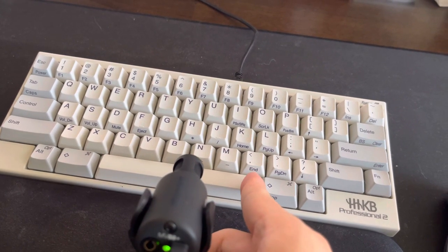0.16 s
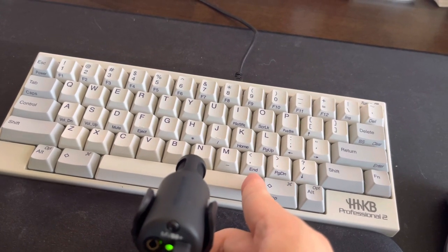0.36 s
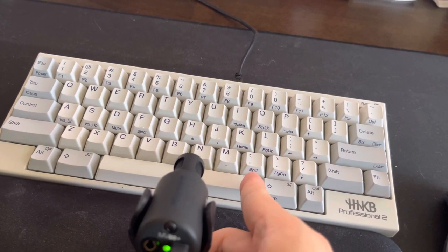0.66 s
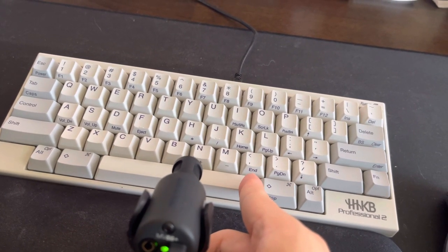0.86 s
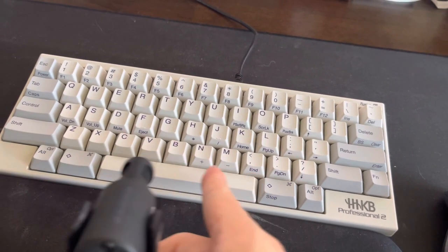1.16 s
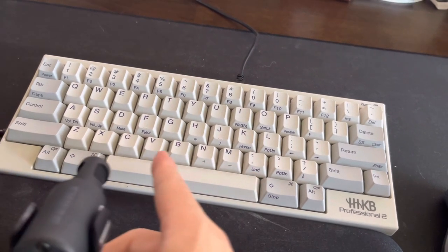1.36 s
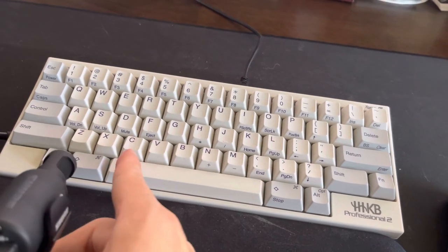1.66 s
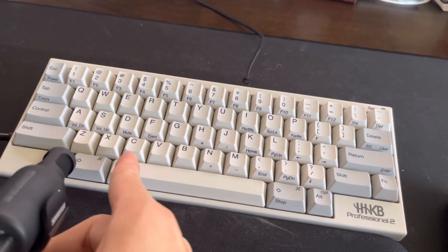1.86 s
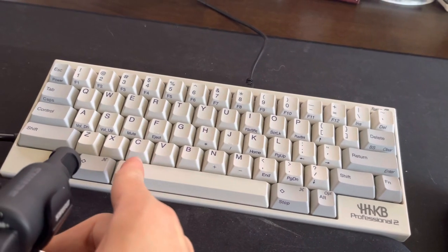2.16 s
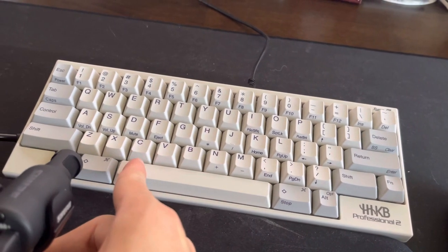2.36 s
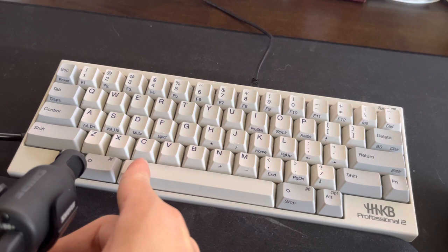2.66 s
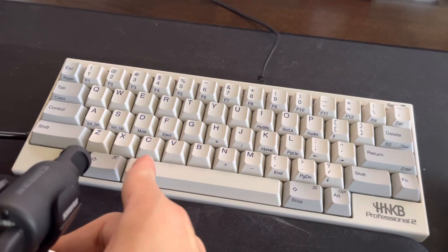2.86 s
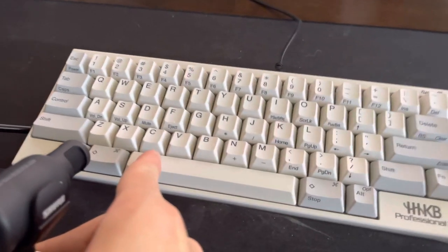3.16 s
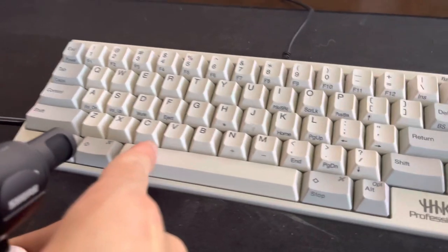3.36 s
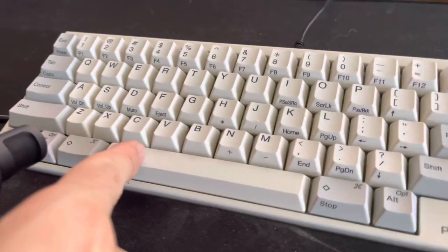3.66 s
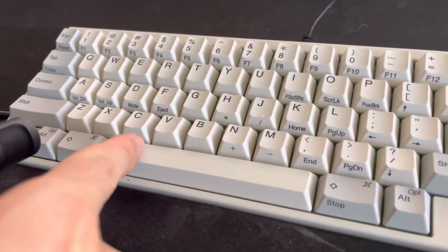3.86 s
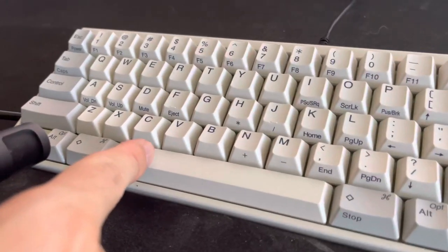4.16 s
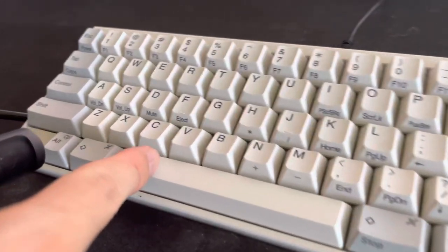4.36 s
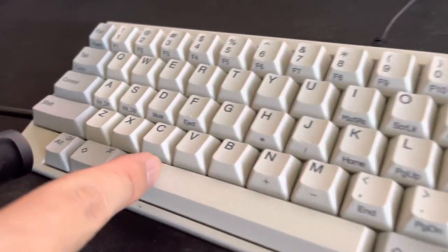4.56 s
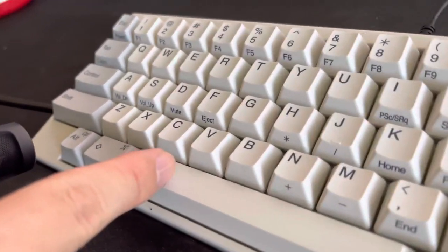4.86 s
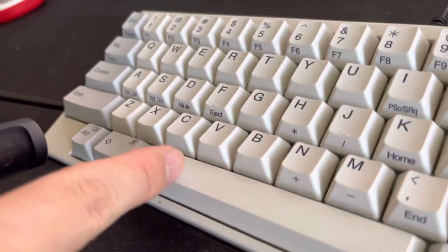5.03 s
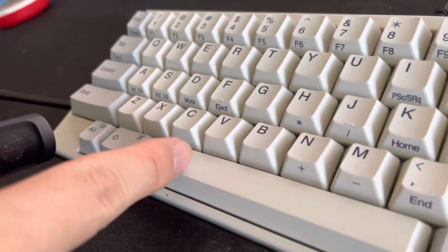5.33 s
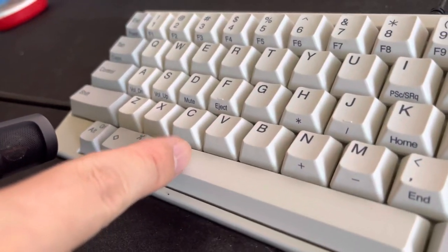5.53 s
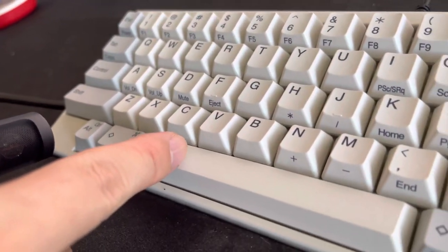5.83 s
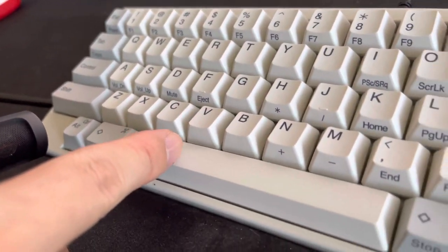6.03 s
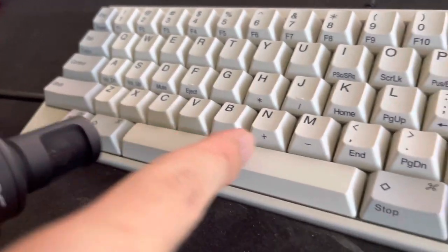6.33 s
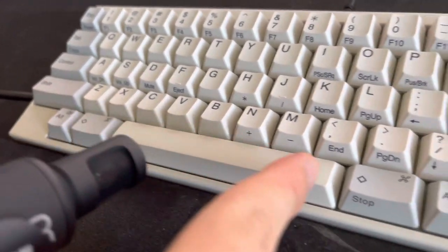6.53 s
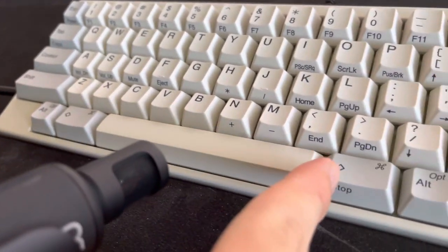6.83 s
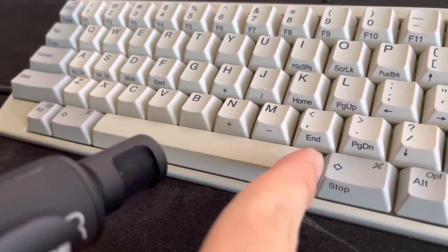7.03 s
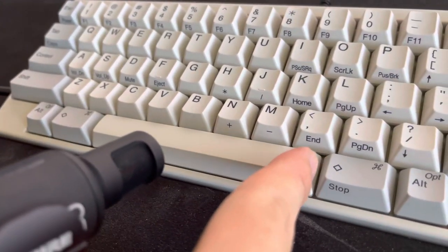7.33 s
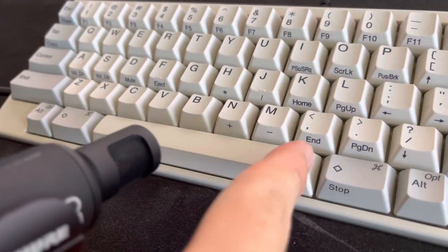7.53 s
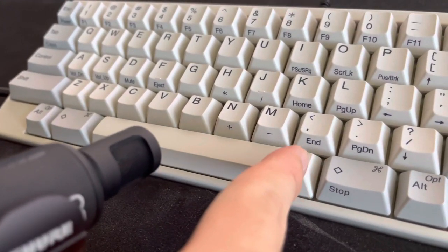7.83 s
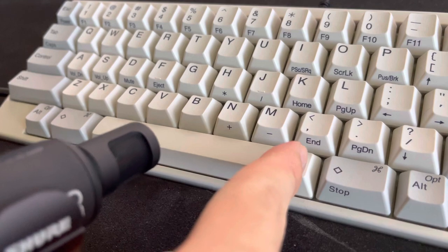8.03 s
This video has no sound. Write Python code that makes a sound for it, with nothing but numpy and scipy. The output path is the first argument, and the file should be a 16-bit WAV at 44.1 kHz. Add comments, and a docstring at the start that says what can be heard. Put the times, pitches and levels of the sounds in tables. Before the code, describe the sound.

A keyboard's space bar is tapped in quick runs, sharp plastic clacks with light return ticks and occasional rattles, in a quiet room.

```python
"""Sharp plastic clacks: a finger taps a space bar at its right end, then the left, then the right again.
Each press drives the bar to the bottom, so the bar rings and the keyboard's case thuds on its desk mat.
The bar springs back with a small tick and sometimes rattles; the fingertip thumps and slides softly.
A close microphone also hears the small room, its low rumble and a faintly whining fan."""
import sys
import numpy as np
from scipy import signal
from scipy.io import wavfile

SR = 44100
rng = np.random.default_rng(int(sys.argv[2]) if len(sys.argv) > 2 else 0)


def master_out(mix):
    """Clip the mix to full scale and print it as 16-bit PCM to the path in sys.argv[1]."""
    frames = np.transpose(np.atleast_2d(mix))
    ceiling = np.clip(frames, -1, 1)
    pcm = np.round(ceiling * 32767).astype(np.int16)
    wavfile.write(sys.argv[1], SR, pcm)


N = 361179
TIME = np.arange(N) / SR
RING_TIME = np.arange(SR // 8) / SR


def from_db(db):
    """Turn decibels (dB) into a number to multiply a sound by."""
    return 10 ** (np.asarray(db) / 20)


def rms_one(x):
    """Scale a sound so that its average strength (rms) is 1."""
    return x / np.sqrt(np.mean(x ** 2) + 1e-20)


def at_hz(points, hz):
    """Read between rows of (frequency, value), giving every octave equal room."""
    frequencies, values = np.transpose(points)
    return np.interp(np.log(hz), np.log(frequencies), values)


def filtered(x, hz, kind, order=2):
    """Keep the "low" part, the "high" part or one "band" of a sound."""
    return signal.sosfilt(signal.butter(order, hz, kind, fs=SR, output="sos"), x + 1e-18)


def add(track, s, sound):
    """Mix a sound into a track, starting at s seconds."""
    start = max(round(s * SR), 0)
    track[..., start:start + sound.shape[-1]] += sound[..., :N - start]


def ring(hz, t60, db):
    """A struck object's tones, each fading 60 dB in t60 seconds; neighbours swing opposite ways."""
    t = RING_TIME[RING_TIME < t60.max()]
    swings = np.sin(2 * np.pi * hz[:, None] * t) * np.exp(-np.log(1000) * t / t60[:, None])
    return (from_db(db) * (-1) ** np.arange(len(hz))) @ swings


# How alike the room noise is on both sides. Each row: frequency in Hz, likeness (1 is identical).
LIKENESS = [(30, 0.95), (120, 0.99), (300, 0.85), (1000, 0.85), (3000, 0.99), (12000, 1)]

def banded_noise(spectrum):
    """Stereo noise shaped in bands about a third of an octave wide; rms 1."""
    lowest, highest = spectrum[0][0], spectrum[-1][0]
    edges = np.geomspace(lowest, highest, int(np.log2(highest / lowest) * 3) + 1)
    out, white = 0, rng.standard_normal((2, 2, N))
    for k, band in enumerate(zip(edges, edges[1:])):
        shared, opposed = filtered(white[k % 2], band, "band")
        hz = np.sqrt(band[0] * band[1])
        alike = at_hz(LIKENESS, hz)
        stereo = np.sqrt(1 + alike) * shared + np.sqrt(1 - alike) * opposed * [[1], [-1]]
        out = out + from_db(at_hz(spectrum, hz)) * stereo
    return rms_one(out)


# The room's rumble and its airy hiss. Each row: frequency in Hz, relative level in dB.
RUMBLE_SPECTRUM = [(20, -7), (45, 1), (70, -1), (100, -4.5), (140, -14.5), (185, -11), (240, -21.5),
                   (330, -35.5), (500, -47)]
AIR_SPECTRUM = [(200, -5), (320, 2), (550, 0), (900, 0), (1300, 2), (1700, -6.5), (2300, -8.5),
                (3500, -14.5), (5200, -15), (7500, -18.5), (13000, -18.5), (16000, -23)]

def room_noise(rumble_db=-55, air_db=-65.5):
    """A steady low rumble under the soft hiss of moving air."""
    rumble = from_db(rumble_db) * banded_noise(RUMBLE_SPECTRUM)
    return rumble + from_db(air_db) * banded_noise(AIR_SPECTRUM)


def wavering_tone(hz, width_hz):
    """Noise passes twice through a narrow filter, leaving one unsteady tone; rms 1."""
    radius = np.exp(-np.pi * width_hz / SR)
    poles = [1, -2 * radius * np.cos(2 * np.pi * hz / SR), radius * radius]
    once = signal.lfilter([1, 0, -1], poles, rng.standard_normal(N + SR))
    return rms_one(signal.lfilter([1], poles, once)[SR:])


# The fan's whine. Each row: pitch in Hz, width in Hz, base level in dB.
WHINE_TONES = [(1249, 4.9, -76.5), (1275, 6.5, -77.5)]
# How loud the whine and hum sound. Each row: time in seconds, whine boost in dB, hum level in dB.
FAN_LEVEL = [(1.2, -3, -58), (1.6, -1, -71), (6.3, 1, -82), (8.19, 4, -75)]

def fan(hum_hz=120.7):
    """A fan whines faintly on two close pitches above a low hum."""
    times, *levels = np.transpose(FAN_LEVEL)
    whine_db, hum_db = [np.interp(TIME, times, db) for db in levels]
    whine = sum(from_db(db) * wavering_tone(hz, width) for hz, width, db in WHINE_TONES)
    return from_db(whine_db) * whine + from_db(hum_db) * wavering_tone(hum_hz, width_hz=14.7)


# The room's first echoes. Each row: delay in seconds, relative level in dB.
EARLY_ECHOES = [(0.01, -39), (0.0107, -22.5), (.0218, -23), (.0231, -26), (.0246, -27)]

def room_echo(dry, tail_db=-22, t60=0.067, wall_hz=5000, build_s=0.0039,
              bass_db=-9, bass_hz=420, bass_t60=0.19):
    """The walls send back a few clear echoes, a faint blurred tail and a short boom."""
    t = np.arange(SR // 2) / SR
    white = rng.standard_normal((2, 2, len(t))) * (1 - np.exp(-t / build_s))
    tail = rms_one(white[0] * from_db(-60 * t / t60)) / np.sqrt(len(t))
    boom = rms_one(white[1] * from_db(-60 * t / bass_t60)) / np.sqrt(len(t))
    response = from_db(tail_db) * tail
    for delay, db in EARLY_ECHOES:
        response[:, round(delay * SR)] += from_db(db)
    response = filtered(response, wall_hz, "low", order=1)
    response += from_db(bass_db) * filtered(boom, bass_hz, "low")
    return signal.fftconvolve(dry, response, axes=1)[:, :N]


def skin_swish(swell_s, centre_hz, octaves):
    """Skin rubs on plastic: a hiss that swells to rms 1 after swell_s and fades again."""
    t = np.arange(int(2 * swell_s * SR)) / SR
    band_hz = centre_hz * 2 ** (octaves * np.array([-.5, .5]))
    hiss = filtered(rng.standard_normal(len(t)), band_hz, "band")
    return np.exp(-(2 * (t / swell_s - 1)) ** 2) * rms_one(hiss)


# Skin slides on the bar. Each row: loudest moment in seconds, swell time in seconds, level in dB,
# centre of the hiss in Hz, its width in octaves.
SLIDES = [(1.848, 0.0034, -63, 10500, 1.1), (4.56, .06, -73, 5140, 0.43), (5.965, .05, -73, 5100, .4),
          (6.032, 0.042, -66.5, 5040, .4), (6.13, .07, -76, 12000, .7), (7.44, 0.023, -71, 10500, .9),
          (7.813, .02, -72, 10500, .9)]

def finger_slides():
    """The finger shifts along the bar with a faint hiss."""
    out = np.zeros((2, N))
    for s, swell_s, db, centre_hz, octaves in SLIDES:
        add(out, s - swell_s, from_db(db) * skin_swish(swell_s, centre_hz, octaves))
    return out


# The keyboard on its mat and desk. Each row: pitch in Hz, fade time in seconds, relative level in dB.
ROCKING_TONES = [(65, 0.17, -4), (107, 0.073, 0.5), (135.5, 0.05, -3.5), (183, 0.075, -8),
                 (238.5, 0.082, -7), (308.5, 0.097, -5), (387, 0.022, -21)]

def case_rocking(contact_ms, scatter_db=3.0, spread_db=2.5, shove_db=2.5, yield_hz=75):
    """A slow push shoves the case, then leaves it rocking; the two sides' average peaks at 1."""
    hz, t60, db = np.transpose(ROCKING_TONES)
    db = db + scatter_db * rng.standard_normal(len(hz)) + spread_db * rng.standard_normal((2, len(hz)))
    push = np.sin(np.pi * np.minimum(RING_TIME * 1000 / contact_ms, 1)) ** 2
    thump = signal.fftconvolve(push[None], ring(hz, t60, db), axes=1)
    thump = thump / np.abs(thump).max()
    # the air is pushed out and drawn back: one swing each way
    shove = filtered(push, (yield_hz, yield_hz * 2), "band", order=1)
    add(thump, 0, from_db(shove_db) * shove / np.abs(shove).max())
    return thump / np.abs(thump.mean(axis=0)).max()


# Low thumps. Each row: start in seconds, peak level in dB, contact time in milliseconds.
SOFT_THUMPS = [(.048, -37, 4.4), (1.123, -44.5, 5.1), (1.969, -43, 3.6), (3.179, -40, 4.5),
               (3.742, -42.5, 4.2), (4.271, -37.5, 6.6), (5.159, -35.5, 3.3), (5.394, -33, 3.8),
               (5.660, -38, 3.2), (5.730, -37.5, 5.8), (5.836, -35, 2.44), (5.905, -40, 4.6),
               (6.316, -38, 7.6), (7.289, -44.5, 7.6), (7.433, -41.5, 3.8), (7.989, -39, 6.9)]

def soft_thumps(scuff_db=-3, scuff_loss_db_per_ms=7.5, scuff_lead_s=0.0029):
    """The case thumps as the finger lands on or leaves the bar; a quicker touch scuffs the skin more."""
    out = np.zeros((2, N))
    for s, peak_db, contact_ms in SOFT_THUMPS:
        add(out, s, from_db(peak_db) * case_rocking(contact_ms))
        scuff = skin_swish(swell_s=0.0065, centre_hz=5200, octaves=0.46)
        add(out, s - scuff_lead_s, from_db(peak_db + scuff_db - scuff_loss_db_per_ms * contact_ms) * scuff)
    return out


# How much louder the left side is than the right. Each row: frequency in Hz, difference in dB
# for a blow at the bar's left end, the same for its right end.
BALANCE = [(202, 5, -4.5), (400, -5, -4.5), (1200, -3, 3.5), (3140, -5, 2), (5470, -3.5, 1),
           (8300, -1.9, 0), (12000, 0, 2)]

def stereo_db(hz, place):
    """Left and right level changes for tones struck at a place on the bar (0 left, 1 right)."""
    frequencies, left_end, right_end = np.transpose(BALANCE)
    balance = np.interp(np.log(hz), np.log(frequencies), left_end + place * (right_end - left_end))
    return np.array([balance / 2, -balance / 2])


# The ring of a rattle. Each row: pitch in Hz, fade time in seconds, relative level in dB.
RATTLE_TONES = [(850, 0.032, -46.5), (1020, 0.033, -44.5), (1214, 0.014, -35), (1460, 0.028, -50.5),
                (1670, 0.026, -52), (2120, 0.018, -45), (2780, 0.019, -48), (3250, .012, -45.5),
                (4200, 0.0087, -46.5), (5200, 0.0055, -47.5)]
# The bar rattles. Each row: start in seconds, force in dB.
RATTLES = [(0.5001, -8), (2.9462, 1.5), (3.152, -7.5), (3.18, -16), (3.462, -13.5), (3.7200, -13),
           (5.4729, -5), (5.6786, -2), (7.6020, -4)]

def bar_rattles(bounce_s=0.00339, bounce_db=-6):
    """The loose bar gives a hollow double knock on its stabiliser, the wire that keeps it level."""
    out = np.zeros((2, N))
    hz, t60, db = np.transpose(RATTLE_TONES)
    for s, force_db in RATTLES:
        for delay, drop_db in [(0, 0), (bounce_s * rng.uniform(0.87, 1.214), bounce_db)]:
            scatter_db = rng.normal(0, 1.5, len(hz))
            add(out, s + delay, ring(hz, t60, db + force_db + drop_db + scatter_db + stereo_db(hz, 0)))
    return out


# How the taps change. Each row: time in seconds, the finger's place on the bar (0 left, 1 right),
# fullness in dB (how much thud and treble the clack has).
PLACE_AND_FULLNESS = [(1.001, 0.96, -3.2), (1.7, 0.13, -2), (4.6, 0.15, .5), (6.1, 0.13, 0),
                      (6.7, 0.73, -1.5), (8.099, 1, .8)]

def place_and_fullness(s):
    """Where the finger is and how full the clack sounds at s seconds."""
    times, place, fullness_db = np.transpose(PLACE_AND_FULLNESS)
    return np.interp(s, times, place), np.interp(s, times, fullness_db)


# The ring of the bar and case. Each row: pitch in Hz, fade time in seconds, relative level in dB
# when struck at the left end, the same at the right end.
BAR_TONES = [(126, 0.012, -29, -29), (227, 0.056, -36, -41), (408.6, 0.058, -43.5, -43),
             (590, 0.024, -52.5, -47.5), (845, 0.0057, -41, -37.5), (1140, 0.068, -56.5, -55.5),
             (1254, 0.031, -47.5, -42), (1650, 0.0048, -38.5, -48), (1885, 0.018, -43, -39),
             (2464, 0.0025, -23.5, -18), (2712, 0.01, -25.5, -27), (2946, 0.012, -33.5, -34),
             (3590, 0.014, -33.5, -29.5), (3990, 0.024, -44, -45), (4410, 0.003, -31.5, -30),
             (5465, 0.0088, -34.5, -38), (5800, 0.004, -39, -30.5), (6140, 0.013, -40, -39),
             (7100, 0.0022, -22, -32.5), (7640, 0.0095, -35, -39.5), (7440, 0.012, -34, -73),
             (8210, 0.0052, -23, -36), (9140, 0.0017, -36.5, -34), (10000, 0.015, -49.5, -44.5),
             (11200, 0.0027, -43, -46), (12340, 0.0098, -46, -54), (13223, 0.0051, -47, -48),
             (14700, 0.0031, -43, -70)]

def bar_blow(place, brightness=0, thud_db=0, variety=1, treble_hz=2800, case_hz=600):
    """One blow: the place decides which tones ring most; brightness adds treble in dB per octave."""
    hz, t60, left_db, right_db = np.transpose(BAR_TONES)
    db = left_db + place * (right_db - left_db)
    db = db + thud_db * (hz < case_hz) + brightness * np.log2(np.maximum(hz / treble_hz, 1))
    # the finger weighs on the bar a little differently each time
    db = db + variety * rng.normal(0, 1.1, len(hz))
    shifted_hz = hz * (1 + variety * rng.normal(0, .009, len(hz)))
    return ring(shifted_hz, t60, db + stereo_db(hz, place))


# The bar springs back up. Each row: time in seconds, force in dB.
RETURNS = [(0.0707, -21.5), (0.3237, -22.5), (0.561, -20), (0.8312, -19), (2.1307, -25), (2.413, -20.5),
           (2.6703, -17), (2.9731, -18), (3.1521, -14), (3.22, -16), (3.4884, -19.5), (3.728, -20.5),
           (3.96, -21.5), (4.2328, -24), (4.4865, -21.5), (4.7513, -24), (4.9981, -12), (5.2642, -24),
           (5.49, -20.5), (5.6968, -21), (5.9265, -22), (7.2199, -19), (7.4449, -23.5), (7.819, -19),
           (7.9899, -24.5), (8.155, -24)]

def bar_returns(left_body_db=0.5, right_body_db=9.5, bass_cut_hz=120, contact_hz=3250,
                stop_hz=2950, stop_t60=0.023, stop_db=-34, lift_db=-26, lift_lead_s=0.00317):
    """The rubber dome throws the bar to its top stop: a tick, hollow on the right, ringing on the left."""
    out = np.zeros((2, N))
    stop_note = ring(np.array([stop_hz]), np.array([stop_t60]), stop_db + stereo_db([stop_hz], 0))
    for s, force_db in RETURNS:
        place, _ = place_and_fullness(s)
        body_db = left_body_db + place * (right_body_db - left_body_db)
        blow = bar_blow(place, thud_db=body_db, variety=2.5, case_hz=1750)
        tick = filtered(blow, contact_hz, "low", order=3)  # a softer contact has less treble
        add(out, s, from_db(force_db) * filtered(tick, bass_cut_hz, "high", order=1))
        add(out, s, from_db(force_db) * (1 - place) * stop_note)
        # freed of the finger's weight, the case rocks
        add(out, s - lift_lead_s, from_db(force_db + lift_db) * case_rocking(contact_ms=4.16))
    return out


def keycap_chatter(ticks_per_s=700, t60=0.27, band_hz=(1800, 6800), size_db=3.0):
    """A jolt shakes the loose keycaps: tiny random ticks that die away; total energy 1."""
    n = len(RING_TIME)
    sizes = from_db(size_db * np.minimum(rng.exponential(1, n), 3)) * rng.choice([-1, 1], n)
    ticks = sizes * (rng.random(n) < ticks_per_s / SR) * from_db(-60 * RING_TIME / t60)
    return rms_one(filtered(ticks, band_hz, "band")) / np.sqrt(n)


# The bar hits the bottom. Each row: time in seconds, force in dB.
PRESSES = [(0.2126, -4), (0.4938, -0.5), (0.7675, 1), (1.9764, -1.5), (2.3190, 1), (2.5880, 1),
           (2.872, 2.5), (3.1153, 2.5), (3.3838, -3), (3.6415, -2.5), (4.1933, -4), (4.4214, 0),
           (4.684, -3), (4.916, 1.5), (5.2179, -8), (5.4127, -2), (5.639, -0.5), (5.8591, 1),
           (7.1337, -6.5), (7.3721, -1.5), (7.6005, -10.5), (7.7395, -1), (7.9386, 0), (8.0980, 0)]

def bar_presses(snap_db=-30, snap_lead_s=0.01, snap_hz=(2400, 4500),
                left_push_db=-43, right_push_db=-36, push_lead_s=0.0045,
                bounce_db=-33, bounce_s=0.0069, bounce_hz=1500, chatter_db=-34):
    """The rubber dome under the bar snaps, the bar clacks down and bounces, and the keycaps chatter."""
    out = np.zeros((2, N))
    for s, force_db in PRESSES:
        place, fullness_db = place_and_fullness(s)
        brightness = 0.78 + 0.33 * force_db + 0.52 * fullness_db  # a harder press is brighter
        thud_db = -0.5 + fullness_db - 0.33 * force_db  # the thud grows more slowly than the clack
        snap = filtered(bar_blow(place), snap_hz, "band")
        add(out, s - snap_lead_s * rng.uniform(0.4, 1), from_db(force_db + snap_db) * snap)
        # the finger's weight reaches the desk just before the clack; the case gives more on the right
        push_db = left_push_db + place * (right_push_db - left_push_db)
        add(out, s - push_lead_s, from_db(force_db + thud_db + push_db) * case_rocking(contact_ms=3.65))
        clack = bar_blow(place, brightness, thud_db)
        add(out, s, from_db(force_db) * clack)
        add(out, s, from_db(force_db + chatter_db) * keycap_chatter())
        for delay in bounce_s * rng.random(size=3) ** 2:
            bounce = filtered(bar_blow(place, brightness - 4, variety=4.4), bounce_hz, "high")
            add(out, s + delay, from_db(force_db + bounce_db) * bounce)
    return out


def scene(right_lag_samples=0.13):
    """The keyboard close up in its room, a hair nearer the microphone's left side."""
    left, right = bar_presses() + bar_returns() + bar_rattles() + soft_thumps() + finger_slides()
    # an all-pass filter delays the right side by a fraction of a sample
    late = (1 - right_lag_samples) / (1 + right_lag_samples)
    keyboard = np.array([left, signal.lfilter([late, 1], [1, late], right)])
    return keyboard + room_echo(keyboard) + room_noise() + fan()


def record(dry, cutoff_hz=16200):
    """The very highest treble is cut off steeply."""
    return signal.sosfilt(signal.ellip(10, .1, 80, cutoff_hz, fs=SR, output="sos"), dry)


dry = scene()
out = record(dry)
master_out(out)
```